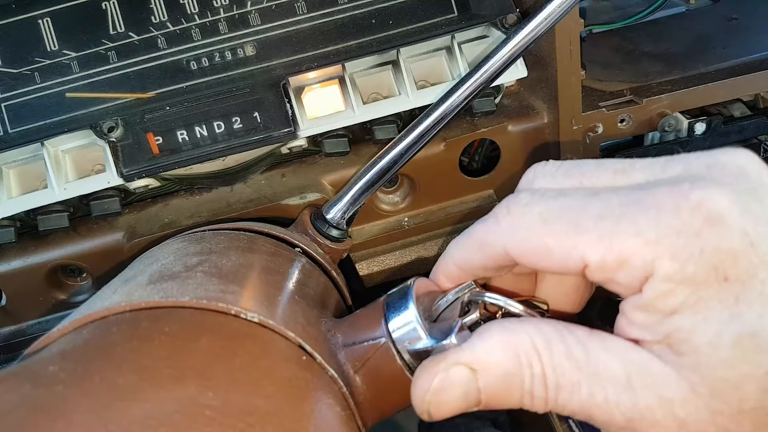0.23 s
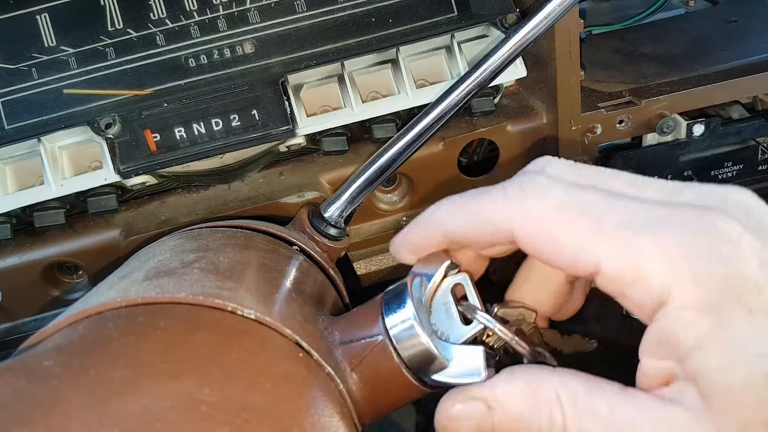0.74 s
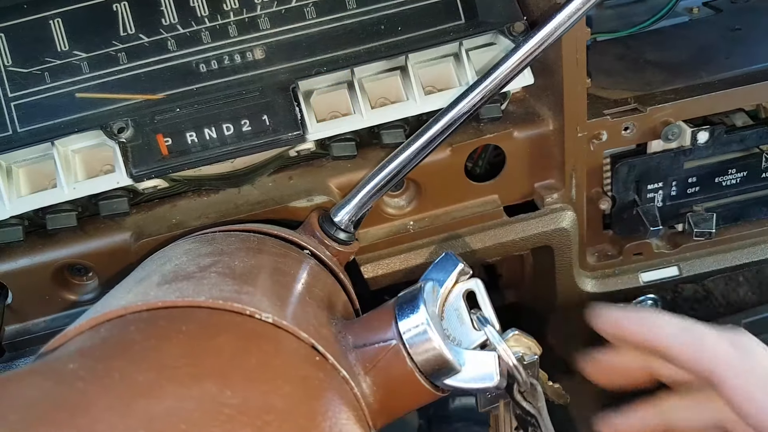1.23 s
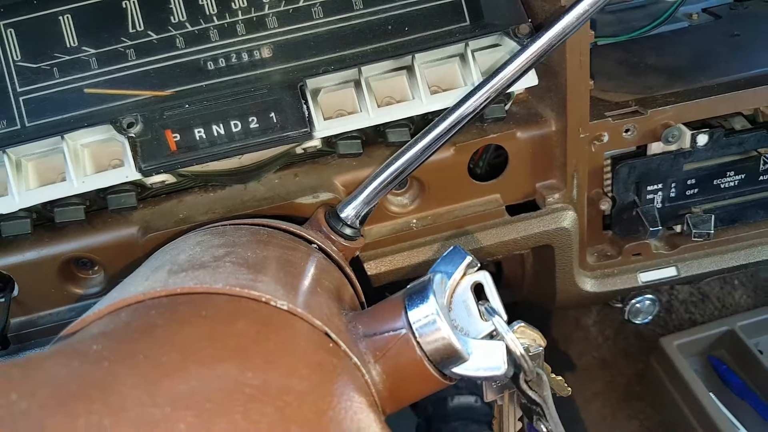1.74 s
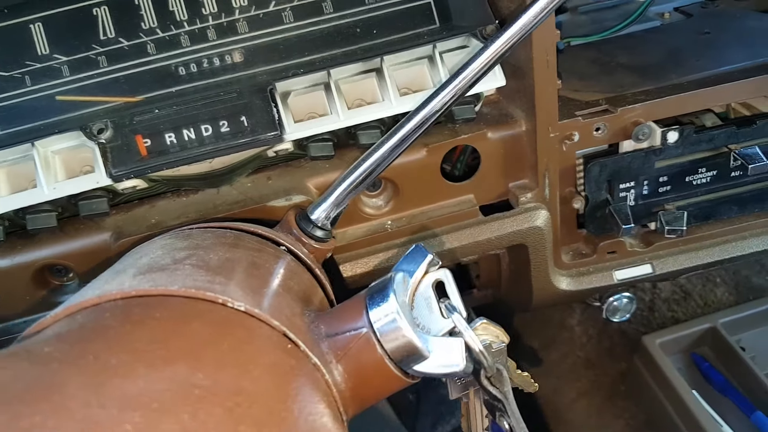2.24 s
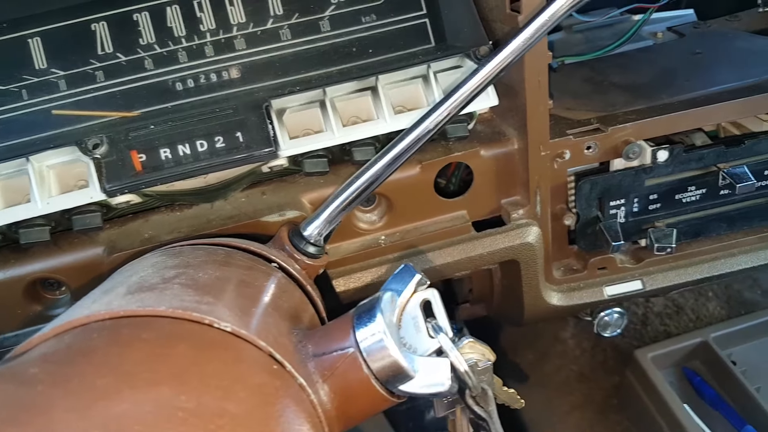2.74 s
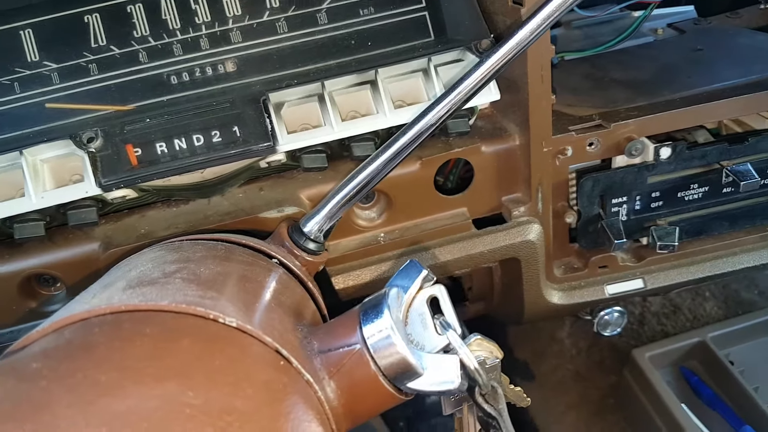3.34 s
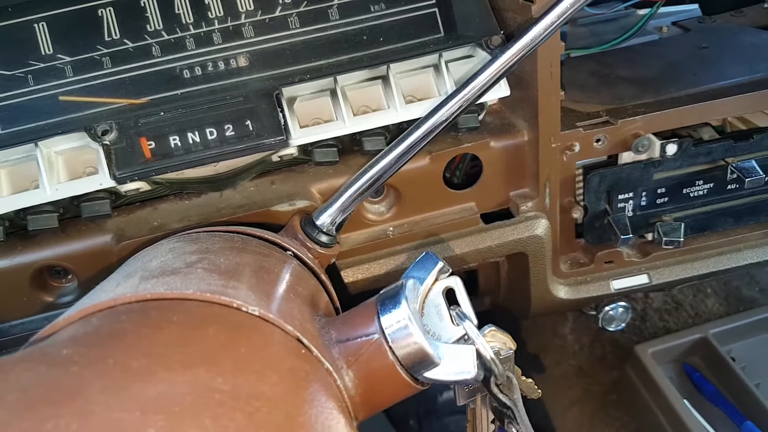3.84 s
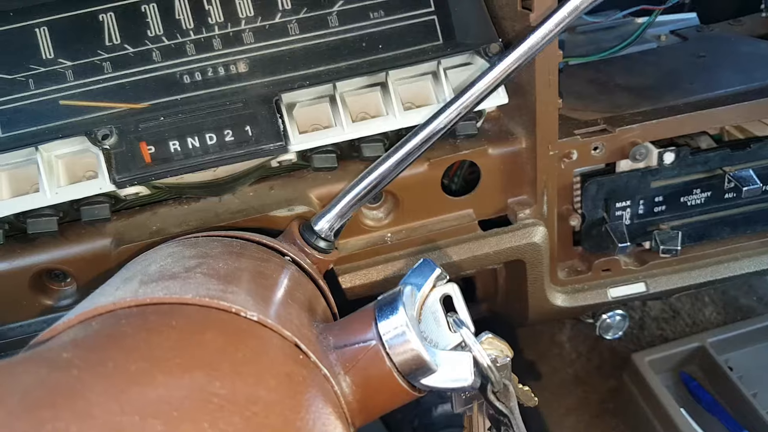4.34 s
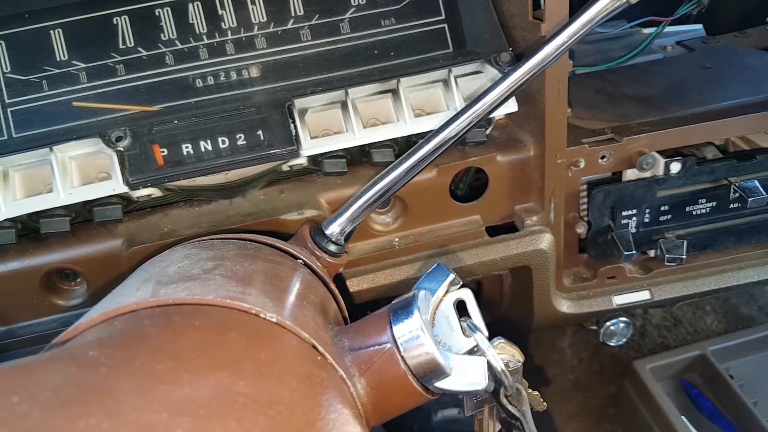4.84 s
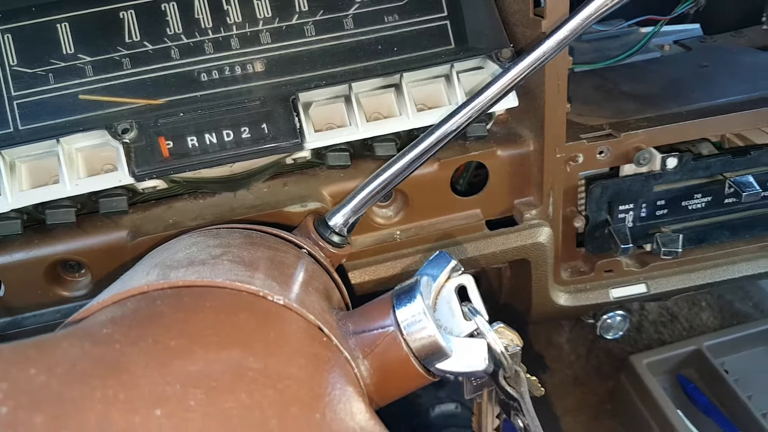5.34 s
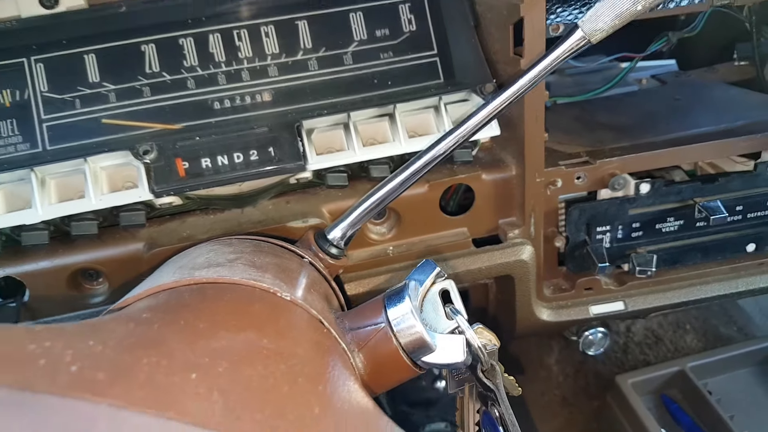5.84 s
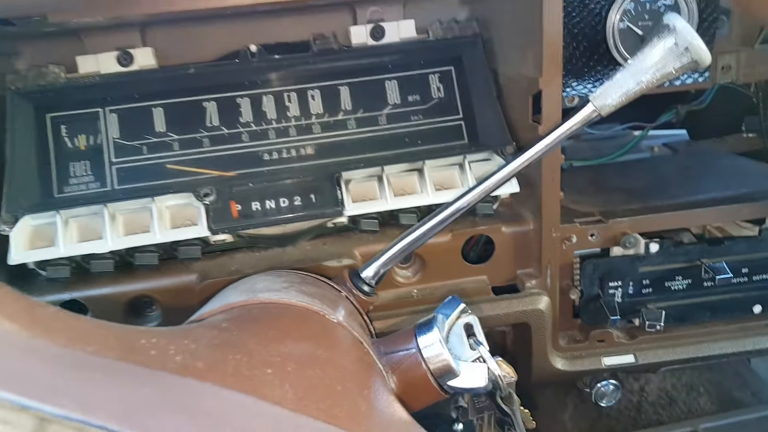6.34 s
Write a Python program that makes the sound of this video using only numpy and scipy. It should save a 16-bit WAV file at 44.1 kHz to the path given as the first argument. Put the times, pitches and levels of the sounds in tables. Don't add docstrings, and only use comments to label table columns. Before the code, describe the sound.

Close, bass-heavy stereo inside an old car's cabin. A faint pump hum and rush lasts until 0.13 s, when the key turns with a sharp clunk and the starter engages. It whines and hums with a gritty gear ring, slowing until about 0.75 s; low pushes thump at 0.55 to 0.72 s and keys clink brightly near 0.7 s. The eight-cylinder engine catches, flaring at 0.85 s, then sinks to a slow throb by 1.8 s. Pedal clicks and a scrape around 2 s precede the first blip, a booming rise peaking near 2.6 s and falling by 3.4 s. Clicks at 3.4 to 3.6 s lead to a second blip peaking at 4.0 s, with a key clink at 3.9 s. From 4.7 s it idles lumpily, dipping at 5.4 s then recovering slightly, over air and belt hiss; soft knocks and extra rustling hiss arrive from 5.75 s, ticks until 6.4 s.

```python
import sys
import numpy as np
from scipy import signal
from scipy.fft import rfft, irfft, next_fast_len
from scipy.io import wavfile
from scipy.ndimage import uniform_filter1d, map_coordinates

SR = 44100
rng = np.random.default_rng(int(sys.argv[2]) if len(sys.argv) > 2 else 0)


def store_pcm(level_fs):
    pcm = np.round(np.clip(level_fs, -1, 1) * 32767).astype(np.int16)
    wavfile.write(sys.argv[1], SR, np.atleast_2d(pcm).T)


def invert_db(level):
    return 10 ** (np.asarray(level, dtype=float) / 20)


N = 291060
T = np.arange(N) / SR

# (time [s], cycle rate [Hz], load [dB])
ENGINE_RUN = [(.6, 6.5, -0.5), (.84, 12.44, 3.5), (1.1, 10.4, 2.5), (1.36, 8.5, 2), (1.8, 6.25, 0),
              (2.03, 7.17, 0), (2.22, 7.2, 2.5), (2.5, 19.4, 4), (2.62, 22.6, 2), (3.1, 11.93, -1),
              (3.36, 8.6, -1), (3.64, 6.9, 1), (4.02, 20.84, 3), (4.27, 14.47, -0.1), (4.67, 7.9, -1),
              (5.4, 6.11, 0.5), (6.14, 9, 1), (6.6, 8.6, 0.6)]
IDLE_HZ = 8


def unit(x):
    return x / np.sqrt(np.mean(x ** 2) + 1e-20)


def along(points, hz):
    f, v = np.transpose(points)
    return np.interp(np.log(hz + 1), np.log(f + 1), v)


def curves(rows):
    s, *columns = np.transpose(rows)
    return [np.interp(T, s, column) for column in columns]


def during(rows):
    first_s, last_s = rows[0][0], rows[-1][0]
    return np.clip(np.minimum(T - first_s, last_s + .02 - T) / .02, 0, 1)


def wobble(rate):
    knots = rng.standard_normal(int(N * rate / SR) + 4)
    return map_coordinates(knots, [T * rate])


def filtered(x, response):
    m = next_fast_len(N + SR // 2)
    return irfft(rfft(x, m) * response(np.fft.rfftfreq(m, 1 / SR)), m)[..., :N]


def modes(rows):
    def response(f):
        total = 0
        for k, (centre, width, db) in enumerate(rows):
            damping = 1j * f * width
            total = total + (-1) ** k * invert_db(db) * damping / (centre * centre - f * f + damping)
        return total
    return response


def tone(hz, db, waver, flutter_db, rate):
    turns = np.cumsum(hz) / SR + rng.random()
    size = np.sqrt(2) * invert_db(db + flutter_db * wobble(rate))
    return size * np.sin(2 * np.pi * turns + waver * wobble(rate))


def rush(response, gate=1):
    return unit(filtered(gate * rng.standard_normal((2, N)), response))


def ports(pair):
    # (frequency [Hz], left-right likeness [0-1])
    likeness = [(60, 0.93), (200, 0.99), (400, 0.84), (800, 0.38), (1500, 0.1), (3500, 0.088), (8000, 0.12),
                (15000, 0.21)]
    # (frequency [Hz], left over right [dB])
    balance = [(60, 3.5), (110, 5.5), (200, 3), (380, 1), (700, 2), (1290, 5), (2380, 5.5), (4400, -1.5),
               (8120, 1), (15000, -3)]
    # (frequency [Hz], phase by which left leads [rad])
    phase_lead = [(60, 0.091), (400, 0.49), (780, 0.49), (1460, 3.35), (2410, 6), (3100, 7.3), (6800, 11.2),
                  (15900, 22.7)]
    half = np.array([[.5], [-.5]])

    def blend(hz):
        turn = np.arccos(np.clip(along(likeness, hz), -1, 1)) / 2
        return np.sqrt(2) * np.array([np.cos(turn), np.sin(turn)])

    def offset(hz):
        return invert_db(along(balance, hz) * half) * np.exp(1j * along(phase_lead, hz) * half)

    mid, side = filtered(pair, blend)
    return filtered(np.array([mid + side, mid - side]), offset)


def low_pair(x):
    return x * invert_db([[1.4], [-1.6]])


def controls():
    flywheel_s, open_s, shut_s = .045, .12, .11
    # (opens [s], shuts [s], depth [0-1])
    pedal = [
        (2.21, 2.49, 1.05),
        (3.66, 3.94, .95),
    ]
    cycle_hz, load_db = curves(ENGINE_RUN)
    cycle_hz = uniform_filter1d(cycle_hz, int(flywheel_s * SR))
    throttle = 0
    for t0, t1, depth in pedal:
        opening = np.minimum((T - t0) / open_s, 1 + (t1 - T) / shut_s)
        throttle = throttle + depth * np.clip(opening, 0, 1)
    return cycle_hz, load_db, throttle


def engine_level(law, cycle_hz, load_db, throttle):
    engages_s, catches_s = 0.149, 0.77
    still_db, jolt_db, jolt_s = -21, 14, 0.087
    idle_db, by_speed, by_load, open_db, crank_db = law
    speed_db = 20 * np.log10(cycle_hz / IDLE_HZ)
    running = idle_db + by_speed * speed_db + by_load * load_db + open_db * throttle
    decay = jolt_db * np.exp(-abs(T - engages_s) / jolt_s)
    jolt = by_speed / 1.96 * np.where(T < engages_s, still_db, decay)
    share = np.clip((T - catches_s) / .04 + 1, 0, 1)
    return uniform_filter1d(share * running + (1 - share) * (crank_db + jolt), size=900)


def exhaust(cycle_hz, load_db, throttle):
    # (multiple of cycle rate, level [dB], load [dB/dB], open throttle [dB], speed [dB/dB])
    orders = [(2, -40, 1, 1.5, .5), (3, -46, 1, 1.5, .9), (4, -24, 1.5, 2.5, .2), (5, -44, 1, 3, .9),
              (6, -30, .5, 5.5, 2), (7, -43, 2, 16, 2), (8, -31, 1.5, 0, .3), (9, -31, -1.5, 0, 1),
              (10, -33, .6, 0, .1), (11, -40, .6, 0, .1), (12, -33, 1.3, -3, -.7), (13, -35, .5, -3, -1),
              (16, -46, .3, -3, .1)]
    # (multiple of belt rate, level [dB], load [dB/dB], open throttle [dB], speed [dB/dB])
    belt_lines = [(12.2, -38.5, .1, .3, 1.63), (17.3, -57.5, .1, 0.5, 2.88)]
    # (centre [Hz], width [Hz], level [dB])
    cabin = [(30, 18, 0), (72, 12, 7.5), (86, 14, 7), (129, 20, 1), (178, 30, 4), (245, 70, 3),
             (370, 90, 0)]
    slip_s, exhaust_db, growth_ends_db = .035, -6.5, 6
    speed_db = 20 * np.log10(cycle_hz / IDLE_HZ)
    capped_db = np.minimum(speed_db, growth_ends_db)

    def line(hz, fast_db, waver, multiple, db, by_load, open_db, by_speed):
        line_db = db + by_speed * fast_db + by_load * load_db + open_db * throttle
        return tone(multiple * hz, line_db, waver, flutter_db=.8 + 5 * waver, rate=8)

    lines = invert_db(exhaust_db) * sum(line(cycle_hz, capped_db, .1 + .035 * row[0], *row) for row in orders)
    grip = 1 / (slip_s * SR)
    belt_hz = signal.lfilter([grip], [1, grip - 1], cycle_hz)
    lines += sum(line(belt_hz, speed_db, .25, *row) for row in belt_lines)
    return low_pair(filtered(during(ENGINE_RUN) * lines, lambda hz: sum(modes([row])(hz) for row in cabin)))


def firings(cycle_hz):
    firing = 8 * np.cumsum(cycle_hz) / SR
    index = firing.astype(int)
    size = rng.standard_normal((2, index[-1] + 1))[:, index]
    pulses = size * (np.diff(index, prepend=0) > 0)
    beat = invert_db(2.4 * size[0] * np.exp(-3 * (firing % 1)) + 1.3 * wobble(18))
    return pulses, beat


def firing_thuds(state, pulses):
    # (idle [dB], speed [dB/dB], load [dB/dB], open throttle [dB], cranking [dB])
    thud_law = (-33, 2.16, -1, 3.5, -31)
    # (frequency [Hz], level [dB/Hz])
    body_curve = [(8.8, -48), (15, -3), (43, -8), (65, -13), (81, -1.5), (108, -10), (134, 0), (194, -11.5),
                  (245, -11.5), (290, -15.5), (355, -17.5), (476, -29), (600, -51), (780, -16),
                  (1320, -120)]
    body = lambda hz: invert_db(along(body_curve, hz))
    shaken = 0.6 * unit(filtered(pulses, body)) + rush(body)
    return invert_db(engine_level(thud_law, *state) - 5.0) * unit(shaken)


def block_noise(state, beat):
    # (idle [dB], speed [dB/dB], load [dB/dB], open throttle [dB], cranking [dB])
    block_law = (-48.5, 1.5, 1.53, -0.5, -42.5)
    roar_law = (-57, 2.92, -4.35, 7.5, -77)
    # (frequency [Hz], level [dB/Hz])
    block_curve = [(210, 9), (350, -10.5), (478, -6), (763, 4.5), (843, 0), (1450, -4.5), (2320, -6),
                   (2650, -14), (5000, -20.5), (6500, -73), (11000, -120)]
    # (centre [Hz], width [Hz], level over the block noise [dB])
    panel_modes = [(529, 50, 8), (820, 230, -1), (1010, 13.5, 11.5), (1250, 24, 10), (1720, 190, 4),
                   (2410, 18, 8), (3020, 48, 11), (3470, 49, 1)]
    # (centre [Hz], width [Hz], level [dB])
    roar_modes = [(624, 550, 0)]

    def panels(hz):
        return invert_db(along(block_curve, hz)) * (1 + sum(abs(modes([row])(hz)) for row in panel_modes))

    clatter = invert_db(engine_level(block_law, *state)) * rush(panels, beat)
    roar = invert_db(engine_level(roar_law, *state)) * rush(lambda hz: modes(roar_modes)(hz) ** 2, beat)
    return clatter + roar


def intake_air(state):
    # (idle [dB], speed [dB/dB], load [dB/dB], open throttle [dB], cranking [dB])
    intake_law = (-59.5, 0.2248, 2.32, 6, -62)
    # (frequency [Hz], level [dB/Hz])
    intake_curve = [(2060, 11), (3500, 7.5), (4700, 1), (5240, 4.5), (5880, 4.5), (6780, 3.5), (7510, -1.5),
                    (10500, -1.5), (13600, -16), (22000, -120)]
    # (centre [Hz], width [Hz], level [dB])
    rustle_modes = [(5610, 980, 0)]
    shift_s, rustle_db = 5.78, -66
    hiss_db = engine_level(intake_law, *state) + 2.0 * wobble(23) + 1.6 * wobble(43)
    hiss = invert_db(hiss_db) * rush(lambda hz: invert_db(along(intake_curve, hz)))
    shifted = np.clip((T - shift_s) / 0.036, 0, 1)
    rustle = invert_db(rustle_db + 1.045 * wobble(7)) * rush(lambda hz: modes(rustle_modes)(hz) ** 2)
    return hiss + shifted * rustle


def bright_air(state):
    # (idle [dB], speed [dB/dB], load [dB/dB], open throttle [dB], cranking [dB])
    bright_law = (-56.5, -0.11, -0.06, 8.5, -70.5)
    # (frequency [Hz], level [dB/Hz])
    bright_curve = [(5000, -42), (8500, -8), (9640, -12.5), (10700, -7), (11700, -5.5), (13800, -0.5),
                    (14800, 1), (15900, -8)]
    # (frequency [Hz], level [dB])
    squeaks = [(11036, -68.5), (13480, -82), (13851, -98), (14212, -112), (14363, -100), (14842, -94),
               (15132, -84), (15299, -88)]
    bright_db = engine_level(bright_law, *state)
    bright_hiss = invert_db(bright_db + 0.32 * wobble(15)) * rush(lambda hz: invert_db(along(bright_curve, hz)))
    whistles = sum(tone(hz + 0 * T, db, waver=2.5, flutter_db=-6, rate=36) for hz, db in squeaks)
    return bright_hiss + invert_db(bright_db + 46.5) * whistles


def engine():
    state = controls()
    pulses, beat = firings(state[0])
    noises = firing_thuds(state, pulses) + block_noise(state, beat) + intake_air(state) + bright_air(state)
    return ports(noises) + exhaust(*state)


def kicks():
    # (time [s], peak [dB], frequency [Hz])
    first_firings = [
        (.545, -15.5, 56.5),
        (0.657, -9, 71.5),
        (0.686, -11, 50),
        (0.72, -11, 65),
    ]
    push = 0
    for s, db, hz in first_firings:
        after = np.clip(T - s, 0, None)
        push = push - invert_db(db - 60 * after / 0.078) * np.sin(2 * np.pi * hz * after)
    return low_pair(push)


def starter():
    # (time [s], ring gear hum [Hz], its level [dB], shaft hum [dB], gear whine [dB])
    cranking = [
        (0.12, 212.2, -21, -43, -25),
        (0.148, 210, -45, -21.5, -38),
        (0.212, 237, -27, -22, -33),
        (0.428, 235.8, -39.5, -50, -31.5),
        (0.54, 203.6, -36.5, -45, -35.5),
        (0.688, 199.6, -22.5, -24.5, -28),
        (0.76, 244, -19.5, -32, -41),
    ]
    # (centre [Hz], width [Hz], level [dB])
    housing = [(960, 90, -5), (1480, 45, -4), (1920, 40, -8), (2390, 45, 0), (3120, 70, -6), (3520, 50, -4)]
    # (frequency [Hz], level [dB/Hz])
    scrape_curve = [(1470, -14), (2500, -11), (3510, -15.5), (5100, -18), (8110, -21), (9390, -27.5),
                    (14300, -25.5), (15900, -33)]
    # (time [s], level [dB])
    meshing = [(0.13, -40), (0.148, -28.5), (0.19, -48)]
    thrown_out = [(0.45, -41.5), (0.714, -36.5), (0.735, -49)]
    late_rustle = [(2.0, -58), (2.01, -43.5), (2.085, -49.5)]
    scrape = lambda f: invert_db(along(scrape_curve, f))
    hz, hum_db, shaft_db, whine_db = curves(cranking)
    hum = tone(hz, hum_db - 10 * (T > .5), waver=1.2, flutter_db=4.5, rate=35)
    hum += tone(142 + 0 * T, shaft_db - 2, waver=.7, flutter_db=2, rate=25)
    rings = sum(invert_db(db + 3 * wobble(30)) * rush(modes([(c, w * .7, 0)])) for c, w, db in housing)
    gears = unit(unit(rings) + 0.43 * rush(lambda f: scrape(f) * (f < 5000)))
    whine = during(cranking) * invert_db(whine_db - 7.5) * gears
    for rows in (meshing, thrown_out, late_rustle):
        whine += during(rows) * invert_db(curves(rows)[0]) * rush(scrape, invert_db(wobble(58.6)))
    return low_pair(during(cranking) * hum) + ports(whine)


def wavering_tones():
    # (start [s], end [s], frequency [Hz], level [dB])
    tone_spans = [
        (.17, .34, 74, -28),
        (.86, 1.06, 765, -44),
        (1.15, 1.25, 765, -48),
        (2.21, 2.38, 1255, -45),
        (3.68, 3.85, 1255, -53),
        (5.3, 5.5, 750, -56),
    ]
    tones = 0
    for t0, t1, hz, db in tone_spans:
        bell = np.sqrt(np.sin(np.pi * np.clip((T - t0) / (t1 - t0), 0, 1)).clip(0))
        waver, flutter_db = min(1.2, hz / 500), min(3.5, hz / 100)
        tones = tones + bell * tone(hz + 0 * T, db, waver, flutter_db, rate=30)
    return ports(np.array([tones, tones]))


def knocks():
    # (time [s], peak [dB], resonance [Hz], top end [dB], left over right [dB])
    trim_knocks = [(0.138, -15, 1980, -12, 5.5), (.1538, -19, 1010, -15.5, 10), (.5444, -35, 965, -20, -1),
                   (.569, -22.5, 1870, -24, 8), (.5949, -23, 910, -30.5, 3), (0.92, -45, 1678, -24, -1),
                   (1.8537, -36.5, 1406, -19, 13), (2.0092, -34, 1885, -9, 7), (2.0402, -35, 1792, -3, -2),
                   (2.0876, -26, 2310, -2.5, 1), (2.2571, -29.5, 950, -18, -8),
                   (2.32, -27.5, 1250, -42, -2), (3.4253, -33.5, 1898, -9, 10.5),
                   (3.5827, -24.5, 2334, -6, 2.5), (5.7517, -30, 925.6, -24, 3),
                   (5.8839, -46, 976, -14, -7), (5.9246, -32, 948.3, -22, 0), (5.9787, -27, 1179, -36, 2),
                   (6.0214, -32, 1430, -20, 1), (6.0383, -34, 980, -25.5, -10),
                   (6.0818, -32, 1647, -16, -2)]
    # (time [s], peak [dB], resonance [Hz], top end [dB], left over right [dB])
    hard_ticks = [
        (1.9338, -28, 2745, -4.5, -1),
        (3.4431, -30.5, 2520, -20, -1),
        (4.67, -42, 2930, -28, 4),
        (4.879, -38, 2935, -19, 5.5),
        (5.453, -41, 2866, -13, 6),
        (6.1437, -43, 2960, -16, -15),
        (6.1978, -42, 2898, -14, -12),
        (6.4169, -34.5, 2770, -24, -8.5),
    ]
    t60_s = 0.07
    out, t = np.zeros((2, N + SR)), np.arange(SR // 4) / SR
    soft = 1 - np.exp(-t / .0007)
    for s, db, hz, top_db, pan_db in trim_knocks + hard_ticks:
        noise = rng.standard_normal((3, 2, len(t)))
        dull = signal.lfilter(*signal.butter(N=4, Wn=[500, 3000], btype="band", fs=SR), noise[0])
        dull = signal.lfilter(*signal.butter(N=1, Wn=900, fs=SR), dull) * min(1, 1400 / hz) ** 2
        note = signal.lfilter(*signal.iirpeak(hz, 9, fs=SR), noise[1])
        edge = signal.lfilter(*signal.butter(N=3, Wn=3600, btype="high", fs=SR), noise[2])
        contact = 4.5 * dull + 3.5 * note + .4 * invert_db(top_db) * edge
        hit = soft * contact * invert_db(-60 * t / t60_s)
        out[:, round(s * SR):][:, :len(t)] += invert_db(db) * hit * invert_db(pan_db * np.array([[.5], [-.5]]))
    return out[:, :N]


def keys():
    # (time [s], peak [dB], highest mode [Hz], 60 dB decay [s])
    key_hits = [
        (0.1411, -52, 12140, 0.031),
        (0.2069, -28, 15000, 0.034),
        (0.697, -14.5, 14500, 0.048),
        (0.7342, -24, 14490, 0.037),
        (0.7682, -29, 13500, 0.026),
        (0.9723, -24, 14600, 0.041),
        (1.935, -34, 13510, 0.034),
        (2.0882, -45, 15410, 0.046),
        (3.5833, -45, 13190, 0.029),
        (3.8844, -19.5, 9240, 0.033),
    ]
    out, t = np.zeros((2, N + SR)), np.arange(SR // 8) / SR
    for s, db, hz, t60 in key_hits:
        tick = np.diff(rng.standard_normal((2, len(t) + 1))) * 0.54
        cluster = hz * np.append(1, rng.uniform(.68, 1, 4))[:, None]
        ring = signal.lfilter(*signal.iirpeak(hz, 12, fs=SR), tick)
        ring = ring + .12 * np.sin(2 * np.pi * cluster * t).sum(axis=0)
        decay = invert_db(db - 6.0 - 60 * t / max(t60, .005))
        out[:, round(s * SR):][:, :len(t)] += decay * (tick + 1.02 * ring)
    return out[:, :N]


def fuel_pump():
    # (frequency [Hz], level [dB])
    pump_hum = [(129.2, -52), (457.6, -63)]
    hum = sum(tone(f + 0 * T, db, waver=.2, flutter_db=1, rate=15) for f, db in pump_hum)
    flow = invert_db(-60) * rush(modes([(332, 290, 0)]))
    return (T < .13) * (hum + flow)


def scene():
    return engine() + kicks() + starter() + wavering_tones() + knocks() + keys() + fuel_pump()


def band_limit(x):
    return signal.sosfilt(signal.butter(12, 16350, fs=SR, output="sos"), x)


def record(dry):
    limited = dry / (1 + abs(dry) ** 12) ** (1 / 12) - .0012
    return band_limit(limited)


dry = scene()
out = record(dry)
store_pcm(out)
```